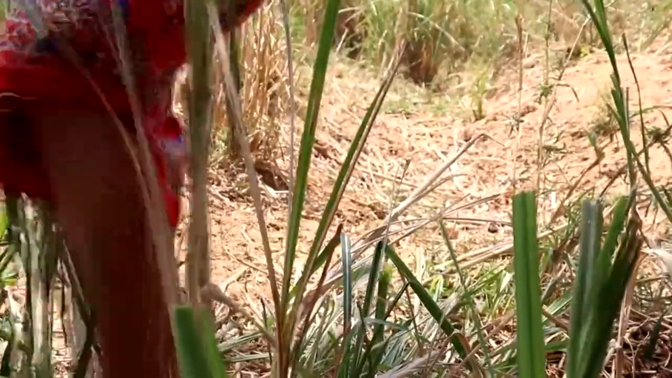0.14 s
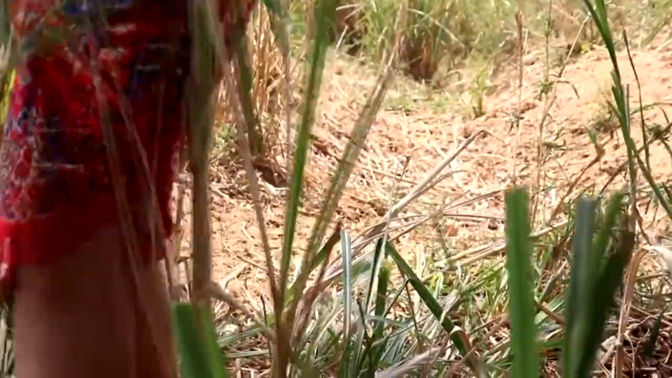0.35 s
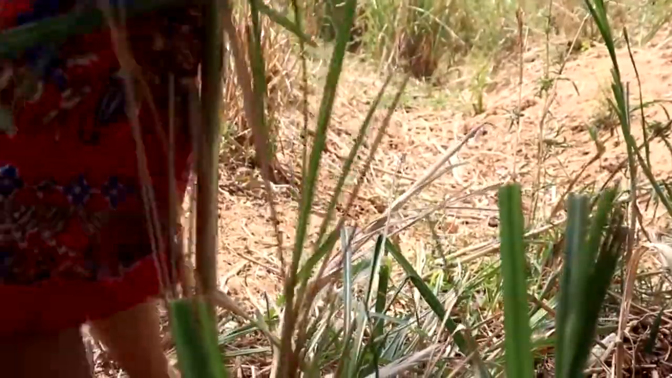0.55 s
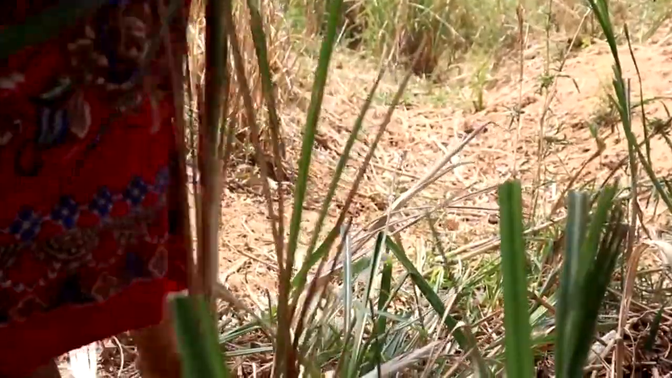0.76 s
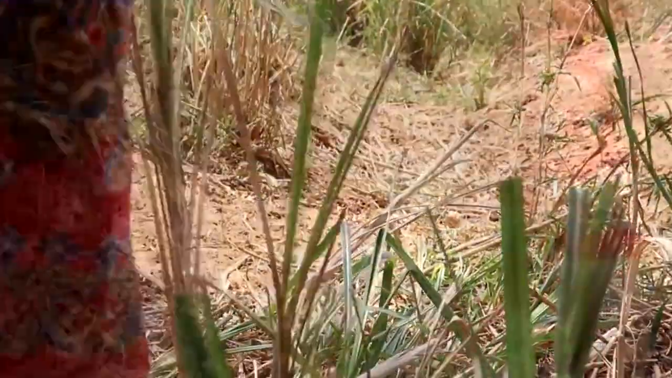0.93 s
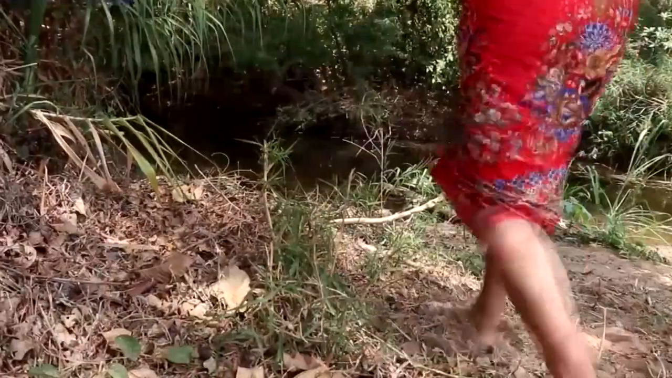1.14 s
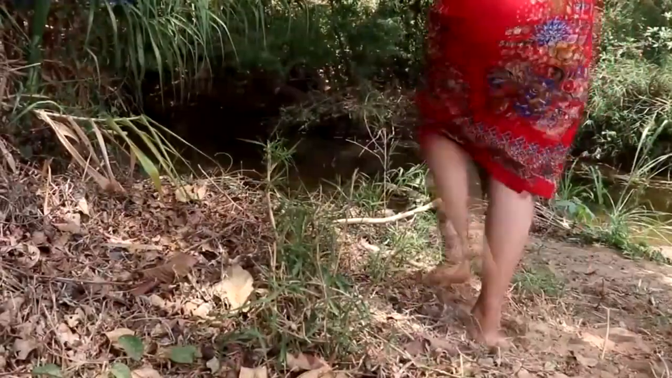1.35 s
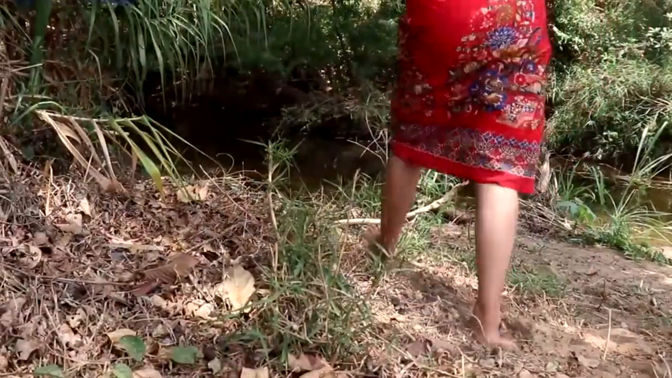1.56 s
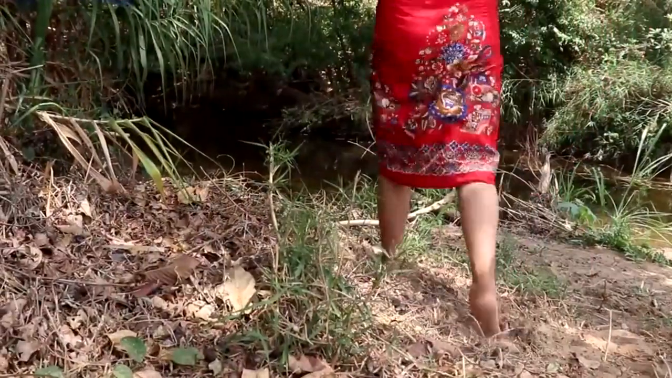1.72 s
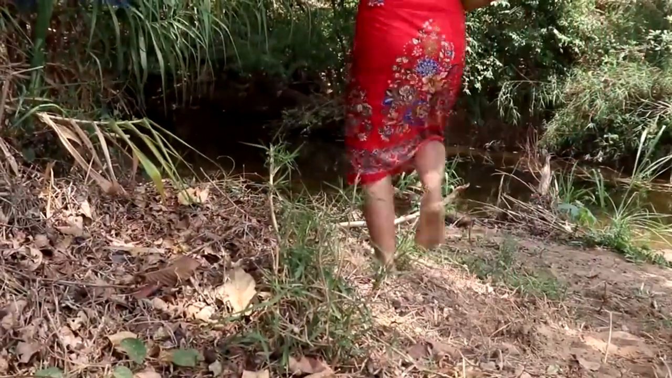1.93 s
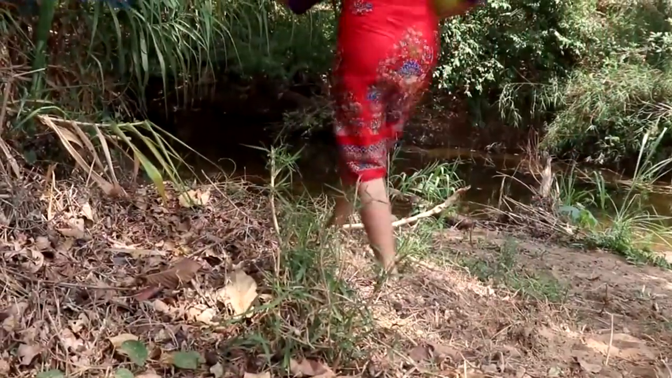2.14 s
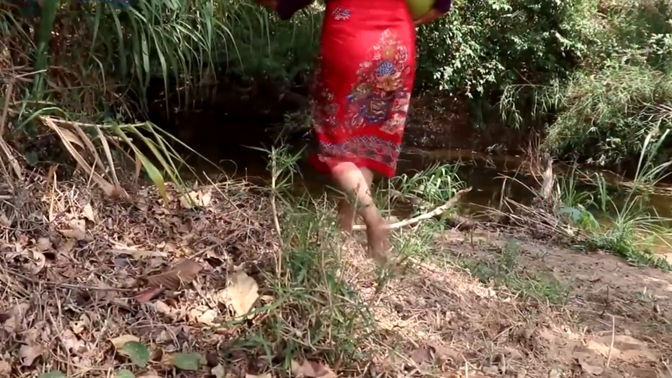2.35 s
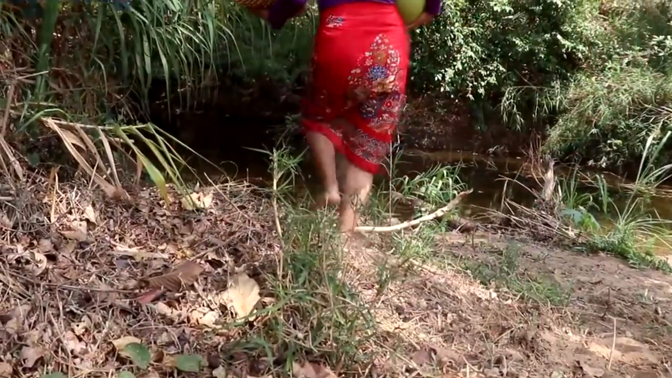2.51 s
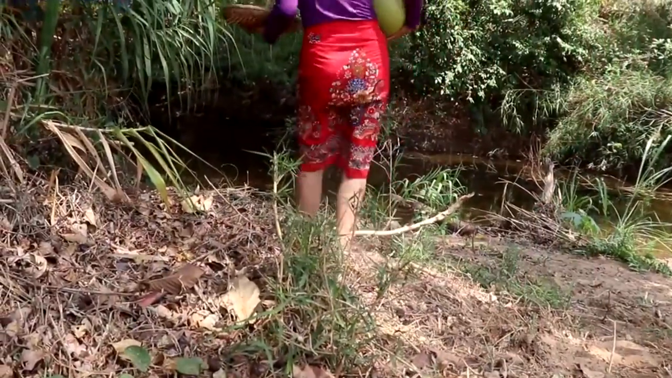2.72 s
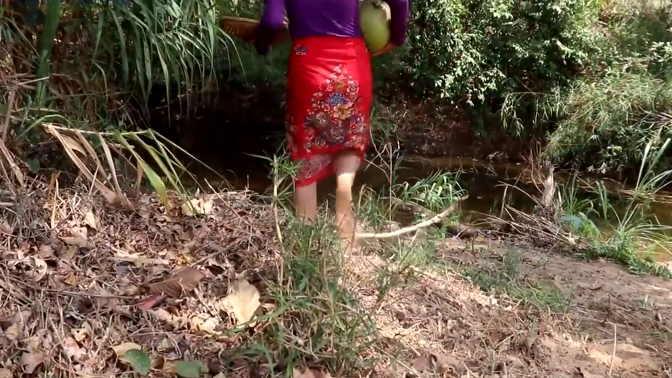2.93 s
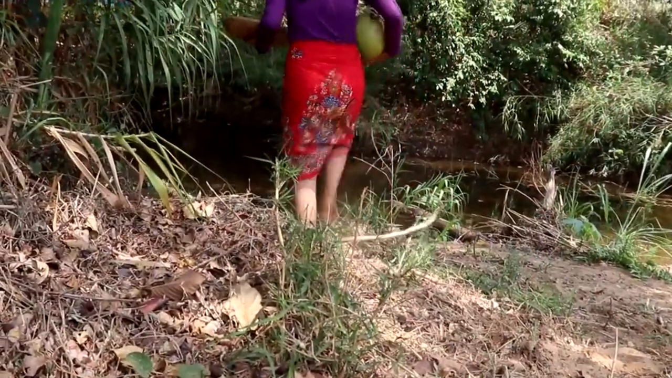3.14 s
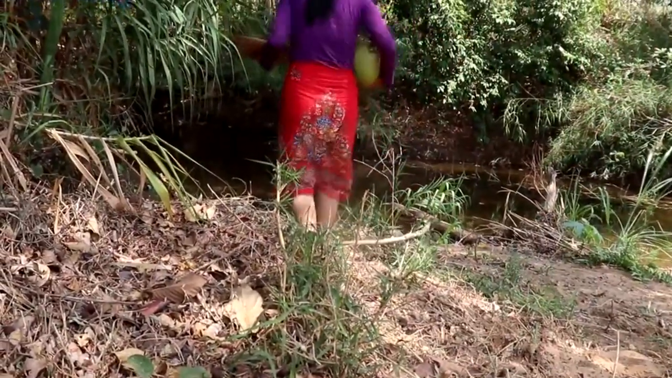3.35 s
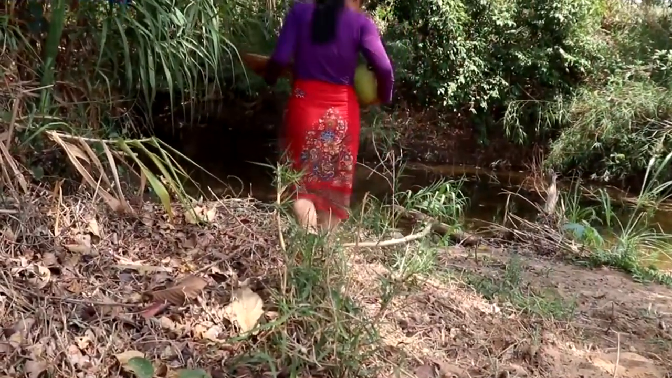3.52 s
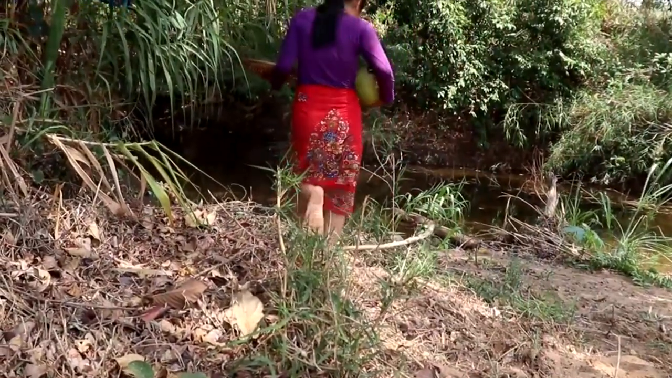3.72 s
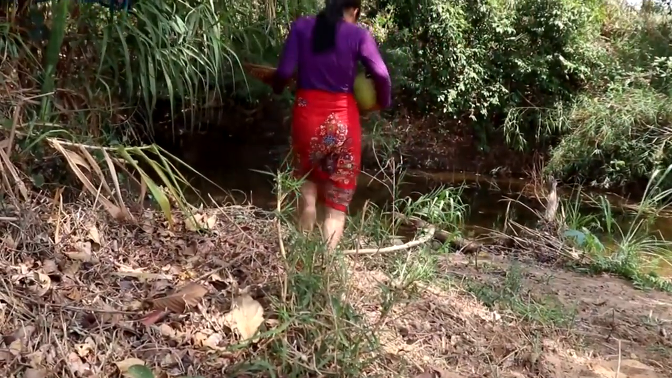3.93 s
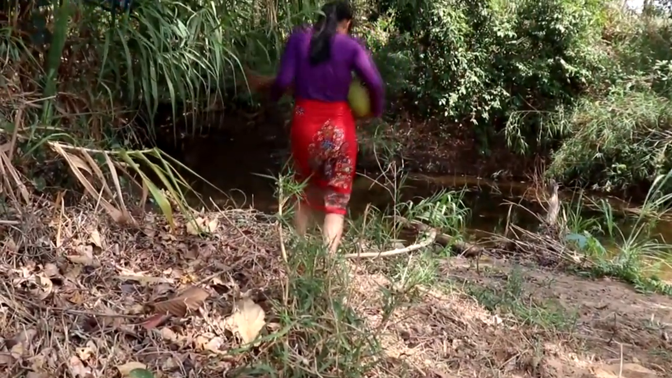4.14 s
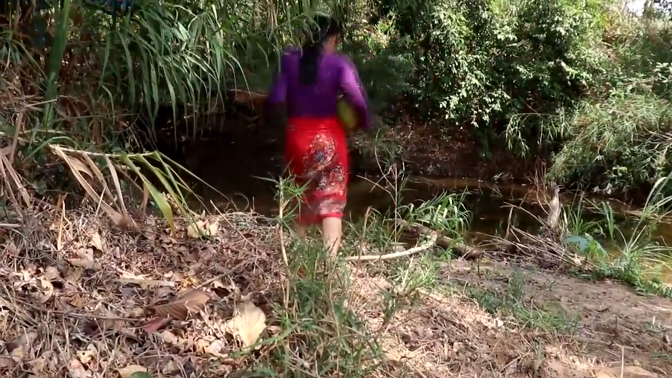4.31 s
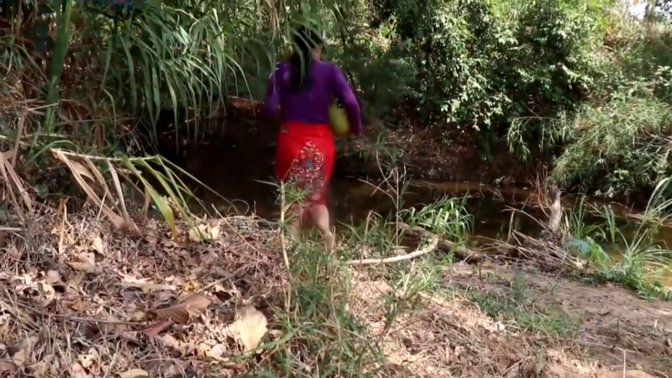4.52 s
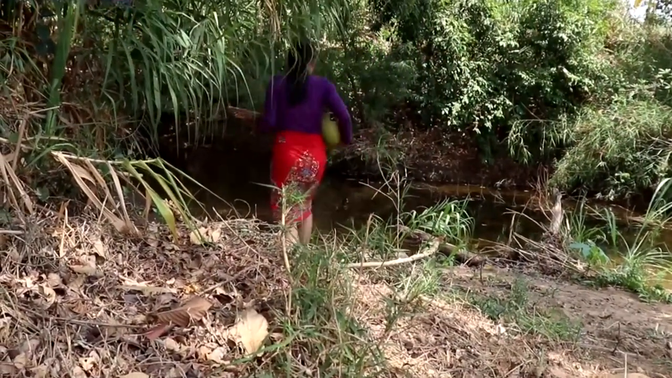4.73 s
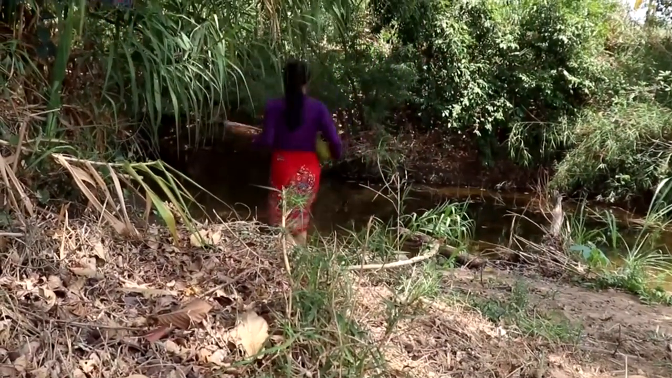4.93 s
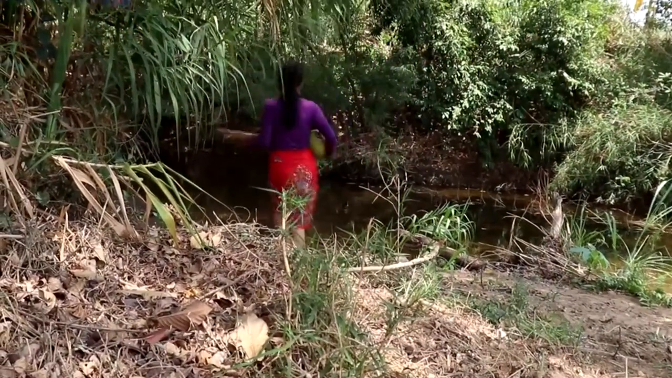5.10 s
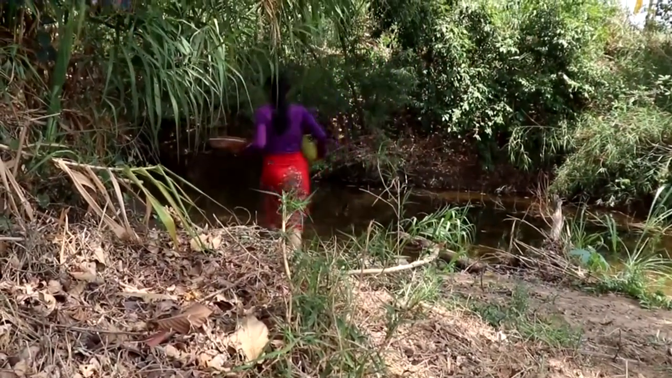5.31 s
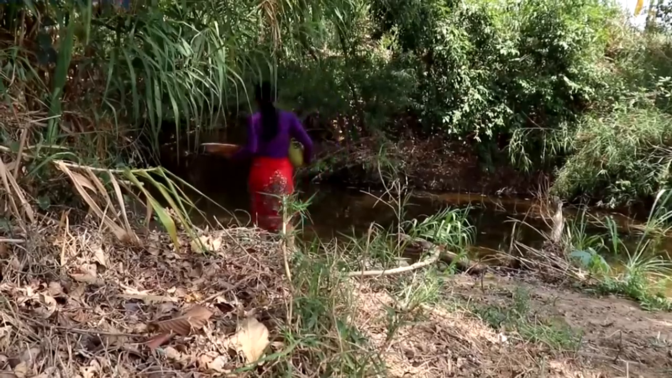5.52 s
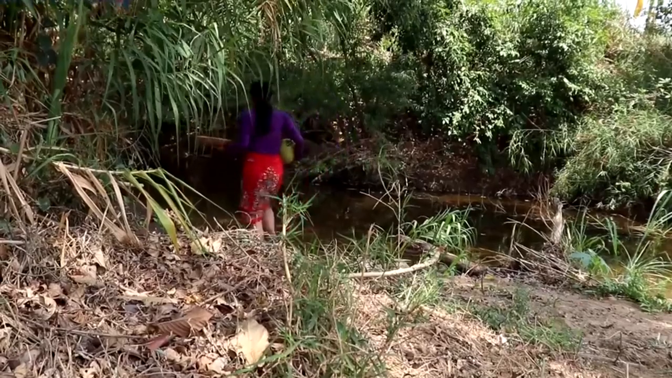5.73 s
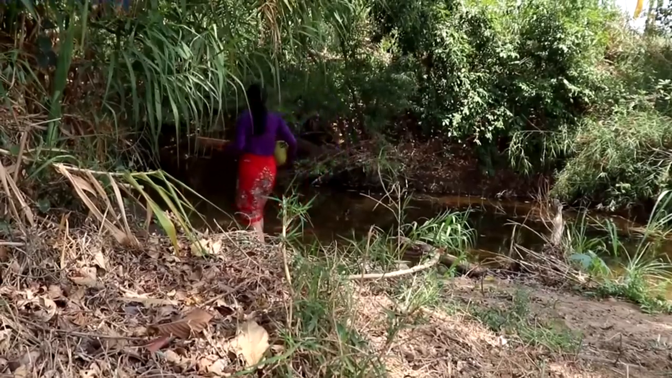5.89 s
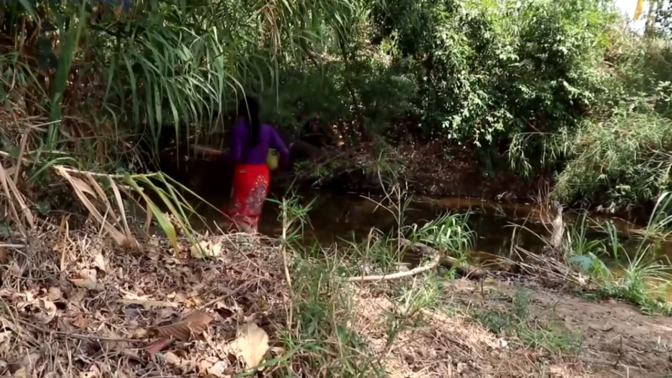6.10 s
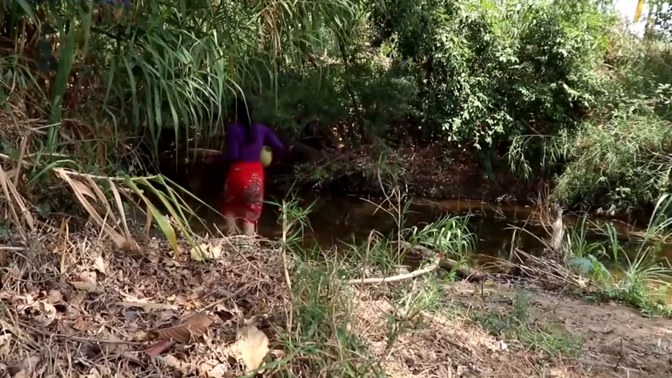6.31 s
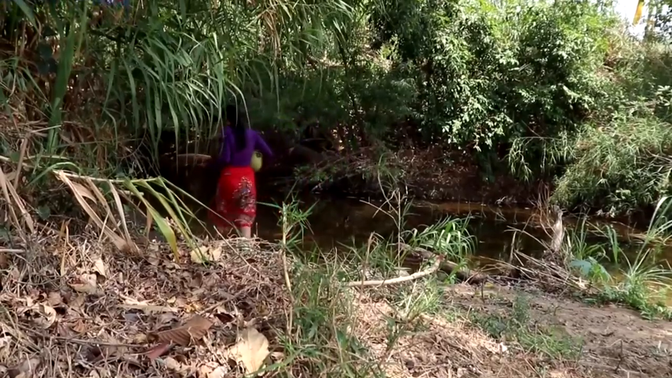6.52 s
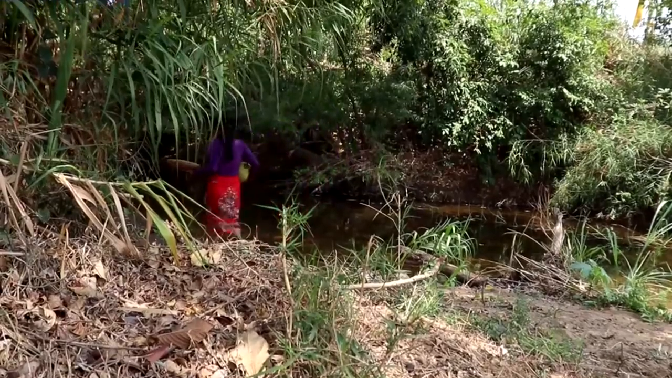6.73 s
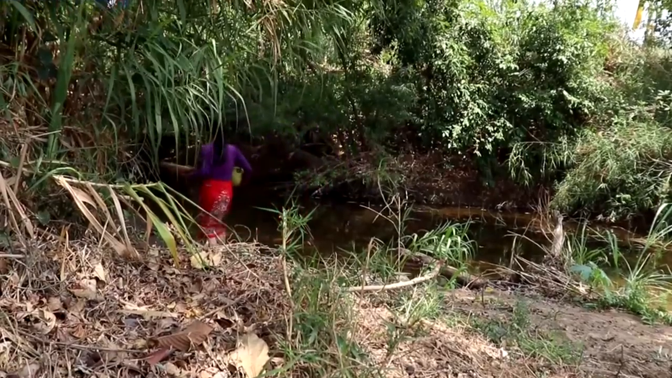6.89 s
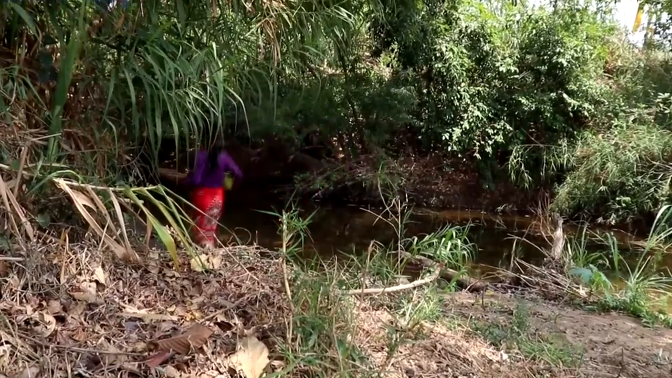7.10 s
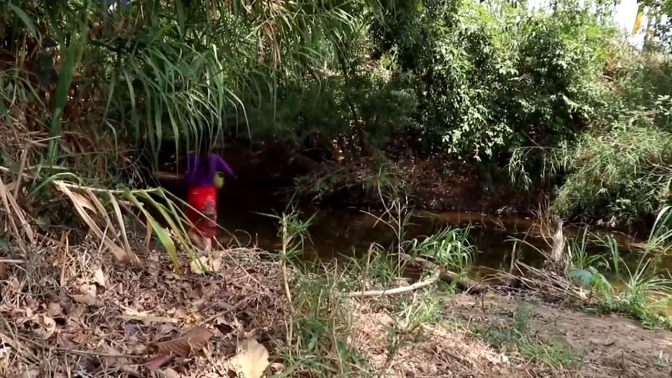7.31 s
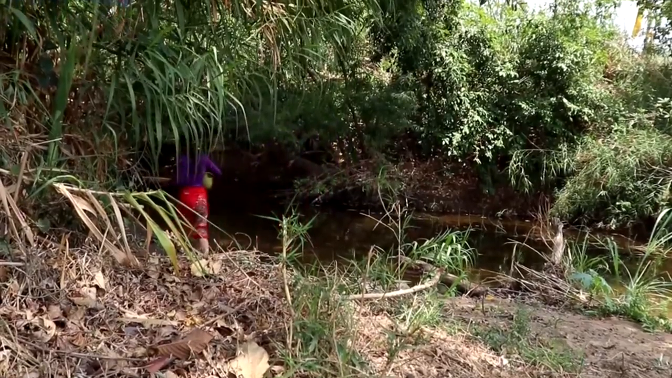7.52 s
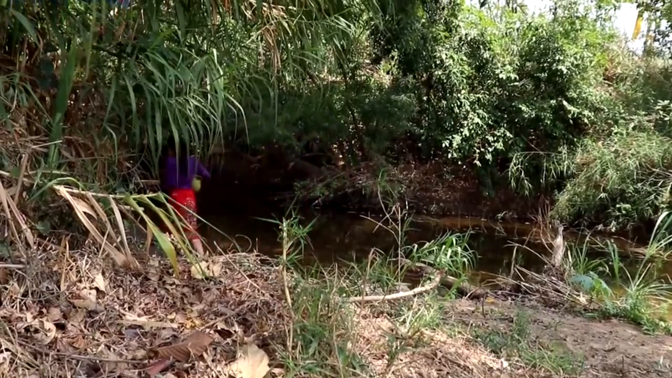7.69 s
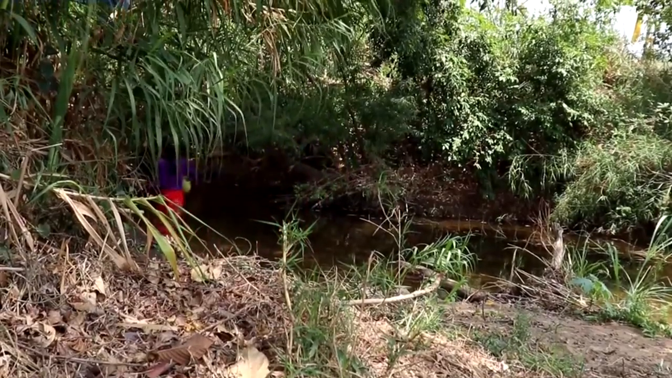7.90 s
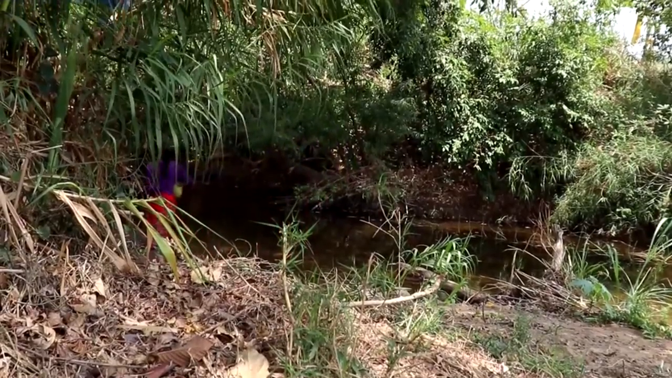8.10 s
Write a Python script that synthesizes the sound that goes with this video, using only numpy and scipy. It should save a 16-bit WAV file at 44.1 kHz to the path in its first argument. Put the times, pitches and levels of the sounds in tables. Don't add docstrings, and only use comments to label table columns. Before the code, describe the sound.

Bare feet crash through tall dry grass up close, then crunch away over brittle leaf litter, fading as a small bird trills high whistles.

```python
import sys
import numpy as np
from scipy import signal
from scipy.fft import rfft, irfft, next_fast_len
from scipy.io import wavfile
from scipy.ndimage import uniform_filter1d, map_coordinates

SR = 44100
rng = np.random.default_rng(int(sys.argv[2]) if len(sys.argv) > 2 else 0)


def volts_from_decibels(level):
    exponent = np.asarray(level, float) / 20
    return 10 ** exponent


def to_wav(s):
    ch = np.atleast_2d(s).T
    pcm = np.round(np.clip(ch, -1, 1) * 32767)
    wavfile.write(sys.argv[1], SR, pcm.astype(np.int16))


N = 359415
MOVE_S = 1.2

# frequency in Hz, level in dB per Hz.
FOLIAGE_TONE = [(88, -22), (150, -4), (240, -8.5), (341, -12.5), (448, -7.5), (662, -7.5), (790, -10),
                (1310, -9.5), (1560, -7.5), (5570, -14), (6770, -19), (7920, -19), (16000, -54)]
RUMBLE_TONE = [(12, -56.5), (20, -16.5), (86, 2.5), (113, -1.5), (140, -5.5), (250, -16), (320, -41),
               (550, -120)]
# frequency in Hz, left-right likeness from -1 to 1.
AIR_ALIKE = [(60, 0.86), (180, 0.76), (550, 0.71), (1650, -0.0023), (4970, -0.24), (15000, -0.23)]
# frequency in Hz, left minus right in dB.
AIR_SIDE = [(60, 0.68), (180, 1.5), (550, 2), (1650, -0.061), (4970, -0.5), (15000, 0.5)]
# peak in seconds, level in dB, rise in seconds, fall in seconds.
DRONE_SWELLS = [
    (0.82, -53.5, 0.25, 0.57),
    (2.3, -62.5, 0.47, 0.9),
    (2.77, -57, 1, 0.39),
    (4.78, -63, 0.15, 1.1),
    (5.05, -57, 0.63, 0.74),
    (5.4, -60, .8, 0.2),
    (7.4, -66.5, 1.3, 0.77),
]

# peak in seconds, level in dB, rise in seconds, fall in seconds, bass weight in dB.
GRASS_PUSHES = [(0.03, -45, 0.49, 0.29, -8), (0.15, -54, 0.26, 0.19, 0), (0.206, -37, 0.012, 0.025, -32),
                (0.335, -35, 0.1, 0.46, -9), (0.42, -34.5, 0.28, 0.61, -10.5),
                (0.478, -33, 0.04, 0.13, -13), (0.545, -45.5, .1, 0.028, -1),
                (0.595, -45, 0.033, 0.022, -1), (0.74, -40.5, 0.2, 0.093, -7.5),
                (0.855, -33.5, 0.33, 0.36, -11), (0.92, -36.5, 0.5, 0.18, -14.5),
                (1.005, -35, 0.067, 0.041, -11), (1.04, -37.5, 0.27, 0.0091, -17)]
NEAR_STEPS = [(1.121, -41, 0.0043, 0.05, -8), (1.15, -48, 0.043, 0.16, -0.5), (1.3, -56.5, 0.24, 0.95, -12),
              (1.5, -55.5, 0.43, 0.064, -3), (1.552, -43.5, .005, 0.12, -7.5),
              (1.67, -40.5, 0.091, 0.12, -14.5), (1.78, -47.5, 0.081, 0.29, -3),
              (1.85, -41, 0.35, 0.22, -11.5), (2.06, -54.5, .3, .08, -9), (2.157, -52, .005, 0.019, -38),
              (2.195, -41, 0.017, 0.086, -12.5), (2.36, -50, 0.21, 0.56, -7.5),
              (2.435, -46.5, 0.048, 0.24, -7.5), (2.67, -38, 0.016, 0.033, -15.5),
              (2.73, -44.5, 0.1, 0.27, -8.5), (2.83, -48.5, 0.24, 0.36, -2.5), (2.93, -46, 0.41, 0.22, -11),
              (3.37, -61.5, 0.2, 0.092, -13), (3.44, -49, 0.027, 0.37, -10), (3.495, -42, 0.1, 0.22, -12),
              (3.62, -51.5, 0.29, 0.41, -8.5), (3.74, -53.5, 0.4, 0.063, -11.5),
              (3.86, -55.5, 0.017, 0.1, -6.5), (3.92, -56, 0.026, 0.21, -5),
              (3.989, -57, 0.0092, 0.092, -10)]
FAR_STEPS = [(4.21, -58.5, 0.29, 0.28, -5.5), (4.335, -53, 0.036, .1, -21), (4.42, -51, 0.12, 0.24, -7.5),
             (4.6, -49.5, 0.28, 0.16, -14), (4.751, -50.5, .008, 0.043, -20), (4.8, -60, 0.14, 0.38, -8.5),
             (5.005, -46.5, 0.087, 0.19, -12.5), (5.22, -59, 0.13, 0.33, -6.5),
             (5.42, -59, .15, 0.56, -9.5), (5.6, -56.5, 0.031, 0.15, -21), (5.72, -70, .3, 0.53, -8),
             (6.05, -61, 0.11, 0.21, -6), (6.12, -70, .1, 0.11, -5), (6.42, -70, 0.12, .2, -9),
             (6.67, -71, 0.29, 0.4, 2), (6.88, -63.5, 0.18, 0.17, -4), (7.16, -76, .3, 0.32, 3),
             (7.67, -74, .08, .18, 5)]
# frequency in Hz, level in dB per Hz.
STALK_TONE = [(59, -47), (100, -21.5), (215, -13.5), (442, -13), (818, -11.5), (1100, -11), (1520, -7),
              (1900, -9.5), (4110, -6), (5650, -8), (8640, -8), (15000, -21), (16000, -37)]
LEAF_TONE = [(59, -34), (100, -11), (302, -8.5), (608, -8), (768, -6), (970, -12.5), (1310, -1.5),
             (1580, -7), (2370, -2), (4570, 1), (9410, 0), (10900, -3), (14400, 4.5), (16000, -29.5)]
# frequency in Hz, left minus right in dB.
STALK_SIDE = [(60, -2), (150, 1), (380, 0.5), (950, 3), (2380, -0.5), (5980, 1), (15000, 0)]
LEAF_SIDE = [(200, -0.5), (1300, 1), (2400, -1.5), (3500, 0.5), (6200, -1.5), (10500, 0.5), (12500, -6.5),
             (14500, -6.5)]
# frequency in Hz, left-right likeness from -1 to 1.
STEP_ALIKE = [(200, 0.98), (1000, 0.87), (2400, 0.7), (5000, 0.51), (10000, 0.44)]
# body, crunch, rustle, sizzle, in Hz.
ZONES_HZ = [900, 3500, 9500, 13500]

# start in seconds, peak in dB, ring in Hz, left minus right in dB.
STEM_SNAPS = [(0.0144, -27, 3920, 4), (0.0368, -31, 3060, 0), (0.1133, -21, 3820, 8),
              (0.2055, -20.5, 6170, 5), (0.2075, -21.5, 5900, -8), (0.2765, -13.5, 3540, -7),
              (0.3252, -14, 3870, 1), (0.3962, -14, 4160, -6), (0.4194, -24, 3390, -4),
              (0.5879, -22, 2710, -2), (0.67, -25, 3880, -7), (0.6973, -16.5, 3220, -2),
              (0.86, -8.5, 3200, -2), (1.0005, -18, 3600, -8)]
MORE_STEM_SNAPS = [(0.0566, -28, 2970, -1), (0.0639, -33, 2200, 4), (0.0895, -28, 3490, 3),
                   (0.0922, -28, 3830, -1), (0.0971, -28, 2370, 3), (0.1154, -32, 1510, 0),
                   (0.1502, -29, 9730, 0), (0.25, -24, 4740, -2), (0.2719, -19, 2650, 18),
                   (0.2954, -28, 3620, 0), (0.368, -24, 2710, -2), (0.4449, -21, 3790, 0),
                   (0.446, -16, 4310, -2), (0.4766, -23, 4260, -5), (0.482, -17, 3920, 2),
                   (0.514, -18, 3430, -1), (0.5377, -20, 7800, 4), (0.554, -20.5, 3140, -1),
                   (0.652, -18, 1430, 1), (0.7289, -20.5, 3320, 0), (0.745, -27, 3770, 2),
                   (0.8537, -15, 3700, -3), (0.88, -27, 8570, 4), (0.8824, -23, 3880, -3), (0.921, -14, 2840, 4),
                   (0.9965, -20, 4310, -5)]
TWIG_SNAPS = [(1.1195, -26, 5490, -8), (1.1234, -20, 4780, -8), (1.17, -23, 6180, -14),
              (1.2707, -26, 2340, -7), (1.3003, -31, 13000, -13), (1.3101, -12.5, 6800, -3),
              (1.3446, -15, 5250, -9), (1.3605, -21, 7500, -8), (1.3857, -26, 2710, -14),
              (1.3956, -30, 2680, -2), (1.424, -20.5, 4460, -2), (1.4581, -26, 9000, -12),
              (1.4903, -24.5, 13000, -9), (1.4927, -21, 6250, -6), (1.5063, -31, 13000, -15),
              (1.533, -31, 5000, -2.5), (1.847, -25, 4670, 0), (1.918, -32, 5020, -2.0),
              (2.1922, -21, 4420, -4), (2.204, -26, 4380, -1.0), (2.428, -31, 3400, -4),
              (2.6656, -23, 5850, -1), (2.6944, -32, 3980, -1.0), (2.719, -25, 4600, -3),
              (3.856, -31, 1780, 0), (3.917, -36, 4430, -1), (3.986, -28, 3270, -2), (4.5356, -34, 4100, 3),
              (4.7508, -28, 12000, -4), (5.5994, -42, 5450, -5)]
MORE_TWIG_SNAPS = [(1.129, -34, 5680, -3), (1.1442, -28, 4950, -4.5), (1.2487, -30, 4520, -5),
                   (1.3467, -22, 7400, 10), (1.393, -29, 2630, -4), (1.5106, -31, 14430, -7),
                   (1.554, -29, 3570, -6), (1.618, -25, 2800, -5), (1.6858, -30, 9780, -3),
                   (1.869, -26, 9910, -2), (1.9099, -27, 2710, -6), (1.9738, -34, 8300, -3),
                   (1.978, -28.5, 5410, -4), (2.0286, -33, 6070, -3), (2.0389, -35, 4820, -5),
                   (2.1562, -37, 12660, -12), (2.1885, -27, 7000, -5), (2.1955, -27, 3960, 4),
                   (2.2198, -28, 4780, -2), (2.2445, -30, 4440, -2), (2.2587, -34, 2410, -2),
                   (2.295, -33, 8870, -4), (2.3244, -35, 4650, -6), (2.3505, -32, 12620, -4),
                   (2.373, -35, 5340, -2), (2.38, -34, 6420, -4), (2.41, -37, 4350, 1), (2.4374, -27, 4010, -2),
                   (2.518, -37, 4950, -3), (2.6224, -37, 8350, -1), (2.67, -25, 9600, 7), (3.006, -38, 6550, 0),
                   (3.1877, -42, 2800, -1), (3.4182, -37, 7280, -7), (3.5038, -19, 3400, -2),
                   (3.5568, -27, 4130, 0), (3.6884, -29, 2080, -2), (3.926, -32, 4350, 1),
                   (3.9906, -27, 4520, -1), (4.1987, -41, 2760, 0), (4.328, -36, 10080, -3),
                   (5.1142, -42, 5770, -3), (5.2066, -38, 5000, -1), (5.4408, -41, 5170, 4),
                   (5.6046, -41, 5380, -3)]
# start in seconds, peak in dB, pitch in Hz.
THUDS = [(0.268, -32.5, 870), (0.342, -28.5, 806), (0.539, -28, 925), (0.648, -35, 1200),
         (0.693, -30, 1020), (0.92, -42, 221), (1.545, -37.5, 1120), (1.771, -38, 815), (1.772, -42, 1250),
         (1.847, -36, 764), (1.869, -38, 755), (2.183, -48, 523), (2.19, -55, 130), (2.195, -57, 65),
         (1.17, -51, 90), (2.759, -34, 1280), (2.908, -30, 2520), (2.658, -38, 260), (3.455, -44, 570),
         (3.474, -42, 590), (3.495, -51, 760), (3.914, -50, 415), (4.384, -43.5, 756), (4.53, -46, 670),
         (7.642, -49, 1010)]
# centre in seconds, crack level in dB, spread in seconds, pitch in Hz.
SHEATHS = [(.33, -26.5, .02, 3400), (.382, -24, 0.016, 3050), (.43, -32, 0.014, 3320),
           (.47, -21.5, .018, 3970), (.52, -27, 0.016, 3000), (.59, -35, 0.011, 2870),
           (.84, -30, .02, 2960), (.92, -28.5, 0.021, 3070), (1.02, -27.5, 0.026, 4200),
           (1.665, -30.5, .025, 3750), (1.82, -34, 0.043, 3600), (2.198, -32.5, .005, 4600),
           (2.8, -36, 0.041, 3800), (3.51, -37, 0.0084, 3770)]

# time in seconds, top pitch in Hz, level in dB.
CHIPS = [(3.955, 7300, -48), (4.04, 7250, -57), (4.0, 7200, -57), (4.2, 7300, -62), (4.24, 7300, -62),
         (4.325, 7150, -61), (5.72, 7150, -58), (6.19, 6420, -63), (6.385, 6230, -61), (7.672, 6750, -55.5),
         (7.71, 6850, -66)]
TRILL = [(4.18, 6090, -52), (4.265, 6150, -57), (4.345, 6200, -58), (4.425, 6400, -51), (4.5, 6200, -56),
         (4.585, 6220, -50), (4.665, 6200, -52), (4.745, 6200, -50), (4.83, 6200, -50), (4.905, 6400, -51),
         (4.985, 6340, -50), (5.065, 6340, -49.5), (5.152, 6590, -49), (5.24, 6450, -49),
         (5.325, 6100, -53), (5.4, 6000, -53), (5.49, 6250, -51), (5.575, 6160, -53), (5.66, 6150, -49.5),
         (5.74, 6120, -51), (5.825, 6150, -50), (5.92, 6110, -52), (6.01, 6430, -53)]
PHRASE = [
    (6.1, 5340, -60),
    (6.197, 5470, -53),
    (6.3, 5460, -50.5),
    (6.4, 5520, -56),
    (6.518, 5850, -58.5),
    (6.732, 5800, -56),
]
HIDDEN = [
    (6.515, 5450, -60),
    (6.622, 5750, -58),
    (6.648, 5880, -58),
    (6.838, 5540, -59),
    (6.862, 5600, -66),
    (6.99, 5430, -64),
    (7.012, 6050, -66),
    (7.03, 5400, -69),
]
# time from top in seconds, rise from 0 to 1, level in dB.
CHIP_NOTE = [(-.008, 1, -30), (0, 1, 0), (.012, 1, -30)]
OPENING_NOTE = [(-.04, .3, -30), (-.024, .6, -20), (-.012, 1, -5), (.01, 1, -5), (.024, 1, -30)]
TRILL_NOTE = [(-.056, -.1, -30), (-.048, 0, -6), (-.038, .3, -11), (-.027, .5, -9), (-.018, .85, -14),
              (-.012, 1, -5), (.007, 1, -6), (.022, 1, -30)]
TRILL_GRACE = [(-.04, 0, -30), (-.03, 0, -12), (-.018, 0, -30)]
PHRASE_NOTE = [(-.027, -.1, -30), (-.019, .25, -16), (-.012, .85, -10), (-.005, 1, -1), (.01, 1, -3),
               (.024, 1, -30)]


def unit(x):
    return x / np.sqrt(np.mean(x ** 2) + 1e-20)


def along(points, hz):
    f, v = np.transpose(points)
    return np.interp(np.log(hz + 1), np.log(f + 1), v)


def wobble(rate):
    knots = rng.standard_normal(int(N * rate / SR) + 4)
    return map_coordinates(knots, [np.arange(N) * rate / SR])


def filtered(x, response):
    n = x.shape[-1]
    m = next_fast_len(n + 8192)
    return irfft(rfft(x, m) * response(np.fft.rfftfreq(m, 1 / SR)), m)[..., :n]


def sides(balance, hz):
    return volts_from_decibels(np.outer([.5, -.5], along(balance, hz)))


def alike(pair, likeness):
    turn = lambda hz: np.arccos(np.clip(along(likeness, hz), -1, 1)) / 2
    mid, side = filtered(pair, lambda hz: [np.cos(turn(hz)), np.sin(turn(hz))])
    return np.array([mid + side, mid - side])


def swells(s, db, rise_s, fall_s):
    t = np.arange(0, N + 64, 64) / SR - s[:, None]
    away = np.where(t < 0, -t / np.abs(rise_s)[:, None], t / np.abs(fall_s)[:, None])
    power = (volts_from_decibels(db[:, None] - 20 * away) ** 2).sum(0)
    return np.interp(np.arange(N), 64 * np.arange(len(power)), power ** .5)


def cracks(s, hz, cycles, gain, lag, size):
    out = []
    for ear in (.5, -.5):
        start = (s + ear * lag + 0.000202) * SR
        index = start.astype(int)[:, None] + np.arange(size) + 1
        turns = (index - start[:, None]) * hz[:, None] / SR
        wave = gain[:, None] * np.sin(2 * np.pi * turns) * np.exp(-turns / cycles[:, None])
        out.append(np.bincount(index.ravel(), wave.ravel(), N + SR)[:N])
    return np.array(out)


def rush(spectrum, patchy_db):
    z = signal.stft(rng.standard_normal((2, N)), nperseg=512)[2]
    field = uniform_filter1d(rng.standard_normal(z.shape[1:]), size=6, axis=0)
    field = uniform_filter1d(field, size=12, axis=1)
    pair = signal.istft(z * volts_from_decibels(patchy_db * unit(field)), nperseg=512)[1][:, :N]
    colour = lambda hz: volts_from_decibels(along(spectrum, hz)) * sides(AIR_SIDE, hz)
    return unit(filtered(alike(pair, AIR_ALIKE), colour))


def air():
    before_move = np.clip((MOVE_S - np.arange(N) / SR) / .2 + .5, 0, 1)
    foliage_db = -58 + 2 * before_move
    hum = [(120, -36), (230, -8.5), (320, -5.5), (400, -10.5), (600, -28.5)]  # (Hz, dB per Hz)
    hum_gain = np.hypot(volts_from_decibels(-68.5), swells(*np.transpose(DRONE_SWELLS)))
    drone = hum_gain * volts_from_decibels(0.74 * wobble(12)) * rush(hum, patchy_db=2)
    foliage = volts_from_decibels(foliage_db) * rush(FOLIAGE_TONE, patchy_db=1.5)
    return foliage + volts_from_decibels(-70) * rush(RUMBLE_TONE, patchy_db=-0.5) + drone


def scatter(x, t60, wet_db):
    hop = 2048
    t = np.arange(hop) / SR
    out = np.pad(x, ((0, 0), (0, 4096)))
    tails = alike(rng.standard_normal((2, N + hop)), STEP_ALIKE)
    for at in range(0, N, hop):
        tail = tails[:, at:at + hop] * volts_from_decibels(-60 * t / t60)
        wet = signal.fftconvolve(x[:, at:at + hop], tail / np.linalg.norm(tail[0]), axes=1)
        out[:, at:at + wet.shape[1]] += volts_from_decibels(wet_db) * wet
    return out[:, :N]


def bursts(rate, fade_s, depth):
    jumps = (rng.random(N) < rate / SR) * rng.exponential(depth, N)
    return 1 + signal.lfilter([1], [1, -np.exp(-1 / (fade_s * SR))], jumps)


def rustle(rows, span, tone, balance, count, lag_ms, spread_ms, spiky_db, clump_db, hiss_db, top_db):
    u, g = rng.random((count, 2)), rng.standard_normal((count, 4))
    s = span[0] + u[:, 0] * (span[1] - span[0])
    hz = np.clip(2800 * np.exp(1.076 * g[:, 0]), 200, 15000)
    gain = volts_from_decibels(-spiky_db * np.log(u[:, 1] + 0.0042)) * np.sign(g[:, 1])
    grains = cracks(s, hz, np.exp(.5 * g[:, 2]), gain, spread_ms * g[:, 3] / 1000, size=64)
    grains = scatter(grains, t60=0.044, wet_db=3.5)

    busy = slice(int(span[0] * SR), int(span[1] * SR))
    f, power = signal.welch(grains[:, busy], SR, nperseg=256)
    flat = filtered(grains, lambda hz: np.interp(hz, f, power.mean(0)) ** -.5)
    fine = alike(rng.standard_normal((2, N)), STEP_ALIKE)
    flat = flat / flat[:, busy].std() + volts_from_decibels(hiss_db) * fine
    flat = flat * volts_from_decibels(clump_db * wobble(14)) * bursts(41, fade_s=0.0021, depth=0.15)

    lag = lambda hz: np.exp(-1j * np.pi * np.outer([1, -1], hz) * lag_ms / 1000)
    colour = lambda hz: volts_from_decibels(along(tone, np.minimum(hz, 14300))) * sides(balance, hz) * lag(hz)
    at, db, rise_s, fall_s, weight_db = np.transpose(rows)
    crunch_db = 3.5 + 0.48 * weight_db
    sizzle_db = top_db + 1 - 1.95 * np.minimum(at, 4)
    zones = (weight_db, 1.15), (crunch_db, 1.15), (0, 1), (sizzle_db, 1)
    out = 0
    for k, (zone_db, linger) in enumerate(zones):
        share = lambda hz: np.interp(np.log(hz + 1), np.log(ZONES_HZ), np.eye(4)[k])
        zone = filtered(flat, lambda hz: share(hz) * colour(hz))
        push = swells(at, db + zone_db, linger * rise_s, linger * fall_s)
        out = out + push * zone / zone[:, busy].std()
    return volts_from_decibels(0.76) * out


def grass():
    return rustle(GRASS_PUSHES, (0, 1.12), STALK_TONE, STALK_SIDE, count=9000, lag_ms=-0.061,
                  spread_ms=0.038, spiky_db=3.5, clump_db=1.6, hiss_db=-1.0, top_db=-3)


def snaps():
    out, t = np.zeros((2, N + SR)), np.arange(1500) / SR
    rows = STEM_SNAPS + TWIG_SNAPS + MORE_STEM_SNAPS + MORE_TWIG_SNAPS
    for (s, db, hz, pan_db), seed in zip(rows, rng.standard_normal((len(rows), 3, len(t)))):
        green = s < MOVE_S
        tone = np.sin(2 * np.pi * hz * t) * volts_from_decibels(-60 * t / .0022)
        rough = 1.1 * signal.lfilter(*signal.iirpeak(hz, 1.3, SR), seed[0]) * volts_from_decibels(-60 * t / .0035)
        ring = tone + rough + .7 * seed[2] * volts_from_decibels(-60 * t / .0012)
        ring = uniform_filter1d(ring, size=3 if green else 1)
        ring = ring / np.abs(ring).max()
        edge_db = -18 + 22 * np.log2(min(hz, 8000) / 5000) - 18 * green
        edge = volts_from_decibels(edge_db) * np.sin(2 * np.pi * 14000 * t) * volts_from_decibels(-60 * t / .002)
        crumbs = volts_from_decibels(-23.5 - 60 * t / 0.05) * (seed[1] + seed[1:])
        right_lag = 3 if s < 1.05 else -2
        for ear, side in enumerate((.5, -.5)):
            at = round((s + .0008) * SR) + (right_lag if ear else 0)
            crack = ring + crumbs[ear] + volts_from_decibels(-8 * side) * edge
            out[ear, at:at + len(t)] += volts_from_decibels(db + 1.5 + side * pan_db) * crack
    notch = lambda hz: 1 - 0.77 * np.exp(-((hz - 10800) / 1100) ** 2)
    return filtered(out[:, :N], lambda hz: notch(hz) * hz ** 2 / (hz ** 2 + 1300 ** 2))


def thuds():
    s, db, hz = np.transpose(THUDS)
    return cracks(s + 0.00408, hz, 2.3 + 0 * s, volts_from_decibels(db - 0.5), 0 * s, size=3000)


def sheaths(count):
    s, db, spread_s, hz = np.repeat(SHEATHS, count, axis=0).T
    g = rng.standard_normal((len(s), 5))
    gain = volts_from_decibels(db - 7.5 + 4 * g[:, 2]) * np.sign(g[:, -1])
    lag = (-.06 + 0.049 * g[:, 3]) / 1000
    pitch = hz * np.exp(0.21 * g[:, 1])
    grains = cracks(s + spread_s * g[:, 0], pitch, 3.4 + 0 * s, gain, lag, size=128)
    return filtered(grains, lambda f: f ** 2 / (f ** 2 + 900 ** 2))


def leaf_litter():
    return rustle(NEAR_STEPS + FAR_STEPS, (1.05, 7.8), LEAF_TONE, LEAF_SIDE, count=28000, lag_ms=0.0086,
                  spread_ms=0.047, spiky_db=2.0, clump_db=0.7, hiss_db=-3, top_db=6.0)


def song(notes, shape, base_hz, pan_db, lag_ms, broken_db, rough_hz):
    when, rise, level_db = np.transpose(shape)
    t, late = np.arange(when[0], when[-1], 1 / SR), np.arange(SR // 4) / SR
    out = np.zeros((2, N + SR))
    hoarse, broken = rough_hz * wobble(250), broken_db * wobble(70)
    fade = volts_from_decibels(-29 - 60 * late / 0.1) + volts_from_decibels(-40.5 - 60 * late / .9)
    for s, hz, db in notes:
        at = round((s + t[0]) * SR)
        pitch = base_hz + (hz - base_hz) * np.interp(t, when, rise) + hoarse[at:at + len(t)]
        cycle = np.cumsum(pitch) / SR
        level = volts_from_decibels(db + np.interp(t, when, level_db) + broken[at:at + len(t)])
        for ear, side in enumerate((.5, -.5)):
            note = level * np.sin(2 * np.pi * (cycle - side * hz * lag_ms / 1000))
            out[ear, at:at + len(t)] += volts_from_decibels(side * pan_db) * note
            echo = signal.fftconvolve(note, fade * rng.standard_normal(len(late)))
            out[ear, at:at + len(echo)] += echo
    return out[:, :N]


def bird():
    chips = song(CHIPS, CHIP_NOTE, 5000, -2, 0.093, 4.1, 230)
    trill = song(TRILL[:7], OPENING_NOTE, 4880, -4, 0.054, 1.9, 120)
    trill = trill + song(TRILL[7:], TRILL_NOTE, 4880, -3.8, 0.044, 2.1, 135)
    grace = song(TRILL, TRILL_GRACE, 6850, -2, 0.032, 3.9, 140)
    phrase = song(PHRASE, PHRASE_NOTE, 4700, -15.0, 0.048, 1.5, 54)
    hidden = song(HIDDEN, PHRASE_NOTE, 4700, -12, 0.054, 1.9, 90)
    return volts_from_decibels(4.5) * (chips + trill + grace + phrase + hidden)


def scene():
    walker = grass() + snaps() + thuds() + sheaths(count=90) + leaf_litter()
    return air() + walker + bird()


def band_limit(x):
    return signal.sosfilt(signal.butter(12, 15990, fs=SR, output="sos"), x)


def record(dry):
    hiss = volts_from_decibels(-75.0) * rng.standard_normal(dry.shape)
    mix = filtered(dry + hiss, lambda hz: 1 / (1 + (hz / 15740) ** 90))
    return band_limit(mix)


dry = scene()
out = record(dry)
to_wav(out)
```